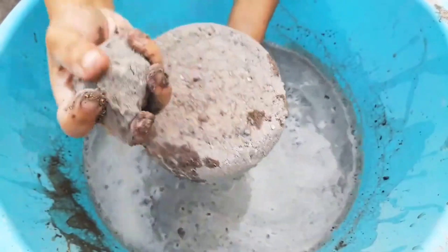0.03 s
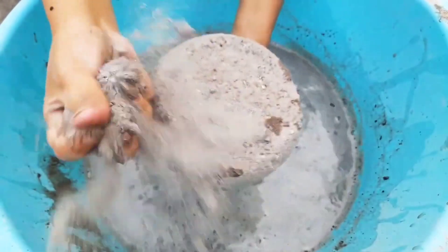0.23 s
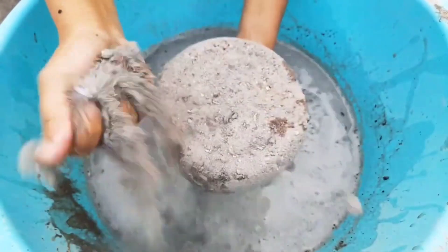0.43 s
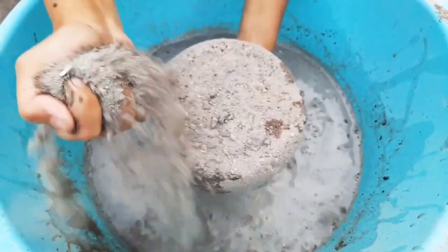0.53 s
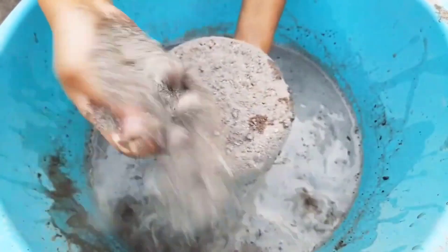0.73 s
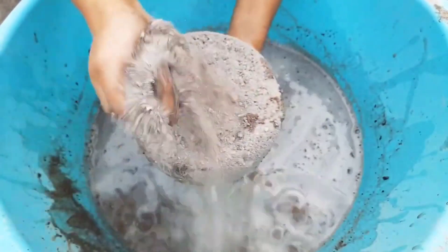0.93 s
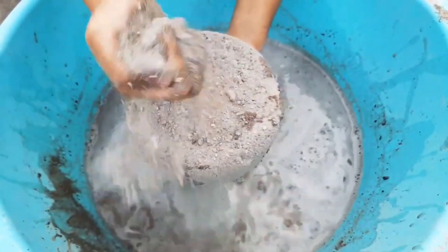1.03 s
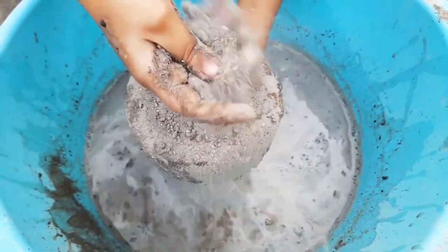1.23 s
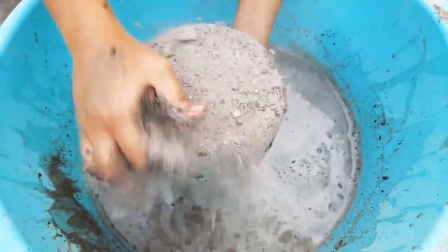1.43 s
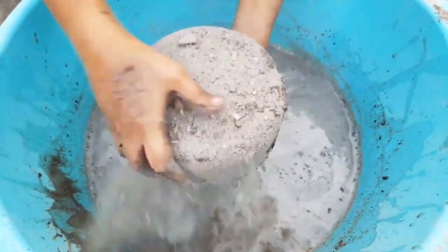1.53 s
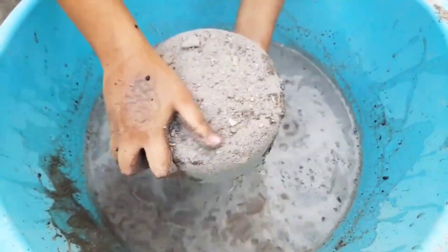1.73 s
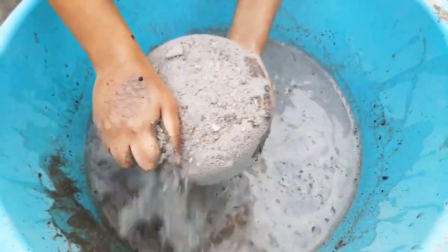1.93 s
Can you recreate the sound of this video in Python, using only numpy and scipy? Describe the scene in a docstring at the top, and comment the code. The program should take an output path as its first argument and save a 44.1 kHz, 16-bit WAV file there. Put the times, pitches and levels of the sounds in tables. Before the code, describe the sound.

Gritty sand showers into a plastic basin of water as a hand crumbles a block, close by. The hiss and patter build from 0.2 seconds and are heaviest between 0.4 and 0.8, with clicking chips, small bubbles and one loud plop at 0.6. The flow thins to light spills after 1.1, then surges again around 1.7 and 1.9. A faint low rumble and hum lie underneath.

```python
"""Sand showers down in waves as a hand crumbles a gritty block over a plastic basin of water, close by.
Crumbs tick and slap on the water, hard chips clink and pebbles snap.
Lumps plunge and ring the basin; trapped air rings as small bubbles.
A low rumble with a faint hum lies underneath."""
import sys
import numpy as np
from scipy import signal
from scipy.fft import rfft, irfft, next_fast_len
from scipy.io import wavfile

SR = 44100
rng = np.random.default_rng(int(sys.argv[2]) if len(sys.argv) > 2 else 0)


def generate_wav(signal):
    """Clip the signal to [-1, 1] and save it as 16-bit WAV at the path in sys.argv[1]."""
    frames = np.transpose(np.atleast_2d(signal))
    scaled = np.clip(frames, -1, 1) * 32767
    pcm = np.round(scaled).astype(np.int16)
    wavfile.write(sys.argv[1], SR, pcm)


N = 88200
TIME = np.arange(N) / SR
TOP_HZ = 15900


def amp(db):
    """Decibels to gain."""
    return 10 ** (np.asarray(db) / 20)


def unit_rms(x):
    """Scale to rms 1."""
    return x / np.sqrt(np.mean(x ** 2) + 1e-20)


def at_hz(points, hz):
    """Interpolate (frequency [Hz], value) points on a log axis."""
    knots_hz, values = np.transpose(points)
    return np.interp(np.log(hz + 1), np.log(knots_hz + 1), values)


def over_time(points):
    """Interpolate (time [s], value) points at every sample."""
    return np.interp(TIME, *np.transpose(points))


def filtered(x, response):
    """Apply a frequency-dependent gain."""
    size = next_fast_len(N + 8192)
    return irfft(rfft(x, size) * response(np.fft.rfftfreq(size, 1 / SR)), size)[..., :N]


def coloured(pair, spectrum, correlation):
    """Two independent signals to stereo of rms 1 with this spectrum and left-right correlation."""
    def mid_side_gains(hz):
        angle = np.arccos(np.clip(at_hz(correlation, hz), -1, 1)) / 2
        return amp(at_hz(spectrum, hz)) * [np.cos(angle), np.sin(angle)]
    mid, side = filtered(pair, mid_side_gains)
    return unit_rms(np.array([mid + side, mid - side]))


def noise():
    """Two-channel white noise."""
    return rng.standard_normal((2, N))


def strike(start_s, attack_s, t60_s):
    """Envelope: quick rise, exponential fall."""
    age_s = np.maximum(TIME - start_s, 0)
    return (1 - np.exp(-age_s / attack_s)) * amp(-60 * age_s / t60_s)


def ring(start_s, hz, t60_s, attack_s, rise_per_s=0):
    """Damped sine with optional upward glide."""
    age_s = np.maximum(TIME - start_s, 0)
    tone = np.sin(2 * np.pi * hz * age_s * (1 + rise_per_s * age_s / 2))
    return strike(start_s, attack_s, t60_s) * tone


def grains(per_s, spread_db, life_s):
    """Tiny noise bursts, random in size and time."""
    hits = rng.random(N) < per_s / SR
    sizes = amp(spread_db * np.clip(rng.standard_normal(N), -2, 2))
    power = signal.lfilter([1], [1, -np.exp(-2 / (life_s * SR))], hits * sizes ** 2)
    return unit_rms(noise() * np.sqrt(power))


def pings(centre_hz, spread_oct, t60_cycles, spread_db, count):
    """Short damped sines, random in time, pitch and size."""
    onset, pitch, size = rng.random((count, 3)).T[:, :, None]
    step = np.arange(SR // 30)
    hz = np.minimum(centre_hz * 2 ** (spread_oct * (2 * pitch - 1)), TOP_HZ)
    cycles = hz * step / SR
    envelope = (1 - np.exp(-cycles)) * amp(-60 * cycles / t60_cycles)
    waves = amp(spread_db * (2 * size - 1)) * envelope * np.sin(2 * np.pi * cycles)
    samples = (onset * N).astype(int) + step
    return np.bincount(samples.ravel(), waves.ravel(), N)[:N]


def echo(x, t60_s, delay_s=0):
    """Convolve with a diffuse stereo tail of energy 1."""
    tail = noise() * strike(delay_s, attack_s=0.00017, t60_s=t60_s)
    tail /= np.linalg.norm(tail, axis=1, keepdims=True)
    return signal.fftconvolve(np.atleast_2d(x), tail, axes=1)[:, :N]


# Rumble envelopes, bass and low-mid (time [s], level [dB])
BASS_LEVEL = [(0, -39), (.25, -39.5), (.7, -38), (1.05, -40), (1.4, -41.5), (1.68, -39.5), (1.85, -41),
              (2, -41)]
LOW_MID_LEVEL = [(0, -52), (.3, -45), (.75, -48), (1.15, -48.5), (1.35, -59), (1.65, -52), (2, -53.5)]
# Rumble spectra (frequency [Hz], relative density [dB])
BASS_SPECTRUM = [(20, -42), (33, -35), (50, -8), (72, -13.5), (98, -2), (125, 0), (160, -7), (200, -28),
                 (250, -27), (310, -22.5), (430, -23), (650, -31), (1200, -39), (1800, -34), (3000, -52),
                 (15000, -54)]
LOW_MID_SPECTRUM = [(120, -56), (150, -4.5), (172, 0), (200, -8), (245, -1), (300, -2.5), (360, -13.5),
                    (450, -17), (620, -42), (1200, -49)]
# Rumble stereo image (frequency [Hz], left-right correlation [-1..1])
RUMBLE_CORRELATION = [(150, .96), (400, 0.68), (2000, 0.067)]
def background(hum_hz=102.4, hum_db=-52):
    """Distant rumble swells and fades over a faint hum."""
    bass = amp(over_time(BASS_LEVEL)) * coloured(noise(), BASS_SPECTRUM, RUMBLE_CORRELATION)
    low_mid = amp(over_time(LOW_MID_LEVEL)) * coloured(noise(), LOW_MID_SPECTRUM, RUMBLE_CORRELATION)
    return bass + low_mid + amp(hum_db) * np.sin(2 * np.pi * hum_hz * TIME)


# Single bubbles (time [s], level [dB], frequency [Hz], t60 [s])
BUBBLES = [(.2053, -25.5, 1500, .011), (0.2073, -21.5, 333, 0.057), (0.4378, -23.5, 1140, 0.026),
           (0.4787, -22.5, 859, 0.053), (.5502, -14.5, 790, 0.022), (.5727, -19, 1020, .016),
           (.596, -20, 1230, 0.031), (0.7337, -18, 530, 0.026), (0.7911, -22.5, 804, 0.014),
           (1.045, -33, 1350, 0.015), (1.098, -29, 2380, 0.012), (1.119, -35, 2870, 0.015),
           (1.194, -37.5, 860, 0.029), (1.209, -38.5, 1980, 0.026), (1.271, -36, 2400, 0.022),
           (1.284, -31.5, 1350, 0.024), (1.391, -23, 1290, 0.018), (1.3945, -34.5, 830, 0.049),
           (1.473, -28, 1790, 0.018), (1.506, -39, 1790, 0.023), (1.599, -33.5, 3230, 0.013),
           (1.602, -36.5, 1120, 0.019), (1.627, -27.5, 2760, .018), (1.657, -25.5, 930, 0.019),
           (1.685, -29, 3200, .015), (1.7061, -27, 1324, 0.024), (1.716, -34, 1150, 0.014),
           (1.751, -32.5, 1650, .035), (1.889, -27, 1640, 0.017)]
def bubbles(wall_db=-6):
    """Trapped air rings, rising slightly in pitch; the basin wall scatters the sound."""
    air = sum(amp(db) * ring(s, hz, t60_s, attack_s=0.00076, rise_per_s=1)
              for s, db, hz, t60_s in BUBBLES)
    return air + amp(wall_db) * echo(air, t60_s=0.022, delay_s=0.0007)


# Chip clinks (time [s], level [dB], frequency [Hz])
CHIPS = [(0.3714, -24, 6300), (0.379, -31, 7000), (.4235, -26, 6400), (0.503, -17.5, 7100),
         (0.66, -22, 7660), (0.7081, -19.5, 5900), (.804, -17, 5630), (.824, -24, 6500),
         (0.845, -22.5, 5500), (0.957, -21.5, 5600), (0.963, -23.5, 5000), (1.48, -30, 4450),
         (1.498, -29.5, 3540), (1.736, -18.5, 5870), (1.8075, -23.5, 5900)]
def chips():
    """Hard chips ring briefly, heard off the basin wall."""
    rings = sum(amp(db) * ring(s, hz, t60_s=0.0053, attack_s=0.0001) for s, db, hz in CHIPS)
    return echo(rings, t60_s=0.013)


# Grit stereo image (frequency [Hz], left-right correlation [-1..1])
GRIT_CORRELATION = [(300, 0.99), (900, 0.15), (1500, 0.5), (2300, -0.12), (4500, -0.13), (12000, 0)]
def grit(pair, spectrum):
    """Colour impact noise: centred lows, wide highs."""
    return coloured(pair, spectrum, GRIT_CORRELATION)


# Pebble impacts (time [s], relative level [dB])
SNAPS = [(.4331, -15), (.4365, -16), (.5484, -17), (.5727, -16), (.5921, -10), (.8041, -21), (1.3899, -17),
         (1.8077, -23)]
# Snap spectrum (frequency [Hz], relative density [dB])
SNAP_SPECTRUM = [(500, -20), (2500, -5), (5000, 8), (7200, -11), (8200, -15), (11000, -5), (15500, -7)]
def pebbles(gain_db=2.5):
    """Pebbles hit something solid: one short, bright crack each."""
    cracks = sum(amp(db + gain_db) * strike(s, attack_s=0.00002, t60_s=0.0016) for s, db in SNAPS)
    return cracks * grit(noise(), SNAP_SPECTRUM)


# Plunges (time [s], level [dB])
LUMPS = [(0.4788, -19), (0.6069, -1.5), (0.7017, -17), (.984, -22), (1.0698, -29.5), (1.7211, -31)]
# Basin and air-cavity modes (frequency [Hz], relative level [dB], t60 [s])
BASIN_MODES = [(294, -16, 0.044), (354, -14.5, 0.033), (497, -6.5, 0.033), (896, -1.5, 0.023),
               (983, -2, 0.02), (1272, -7, 0.029), (1575, -9, 0.024)]
def lumps(far_wall_db=-6, left_right_delays_s=(0.00219, 0.002556), scatter_db=-15):
    """Plunging lumps ring the basin; the far wall reflects the sound."""
    plunge = sum(amp(db + mode_db) * ring(s, hz, t60_s, attack_s=0.0017)
                 for s, db in LUMPS for hz, mode_db, t60_s in BASIN_MODES)
    reflection = np.array([np.interp(TIME - delay_s, TIME, plunge) for delay_s in left_right_delays_s])
    scatter = echo(plunge, t60_s=0.019, delay_s=0.0024)
    return plunge + amp(far_wall_db) * reflection + amp(scatter_db) * scatter


# Crumb ticks and cluster slaps (time [s], level [dB], t60 [s])
TICKS = [(0.2309, -32.5, 0.05), (0.281, -36.5, 0.022), (0.331, -33, 0.014), (0.3707, -39, 0.013),
         (0.3902, -32, 0.065), (0.421, -48, 0.016), (0.4322, -19.5, 0.019), (0.4365, -24, 0.039),
         (.452, -24, 0.019), (0.504, -24.5, 0.014), (0.513, -27, 0.018), (0.549, -18.5, 0.0054),
         (.5597, -22, 0.021), (0.5725, -24, 0.0074), (0.5902, -18, 0.026), (0.595, -24, 0.02),
         (0.6063, -20, .02), (0.651, -28, 0.028), (.709, -38, 0.0097), (0.7312, -31, 0.02),
         (0.8025, -30, .013), (0.817, -25.5, 0.025), (0.822, -32, 0.016), (0.845, -34, 0.038),
         (.865, -41, 0.013), (0.889, -34, 0.015), (.957, -34, 0.074), (1, -32, .02), (1.069, -28.5, 0.022),
         (1.278, -30, 0.017), (1.3882, -26.5, 0.036), (1.4138, -40, .012), (1.433, -34, 0.025),
         (1.4737, -33.5, 0.017), (1.655, -28.5, 0.026), (1.7193, -26.5, 0.018), (1.737, -38, 0.024),
         (1.8073, -31.5, 0.005), (1.89, -32.5, 0.063)]
SLAPS = [(.2053, -28.5, 0.029), (.28, -35.5, 0.047), (0.393, -33, 0.059), (0.434, -23, 0.037),
         (0.439, -31, 0.043), (0.473, -21.5, 0.058), (0.511, -31, 0.15), (0.548, -29, .035),
         (0.571, -16.5, 0.028), (0.5911, -18.5, 0.038), (0.594, -25, 0.081), (0.608, -24.5, 0.052),
         (0.687, -26, .05), (.698, -21.5, 0.068), (0.732, -30, 0.028), (0.79, -26.5, 0.029),
         (0.802, -29, .03), (0.815, -24.5, 0.059), (0.975, -34.5, 0.15), (1.07, -25, 0.017),
         (1.191, -46, .025), (1.284, -38.5, 0.07), (1.391, -30, 0.028), (1.655, -28, 0.022),
         (1.705, -28.5, 0.021), (1.717, -29.5, 0.066), (1.886, -29, 0.015)]
# Tick and splash spectra (frequency [Hz], relative density [dB])
TICK_SPECTRUM = [(200, -20), (1000, -16.5), (2500, -4.5), (4500, 3), (7200, 2), (8100, -4.5), (10000, -2.5),
                 (15500, -5.5)]
SPLASH_SPECTRUM = [(100, -26), (280, -11), (480, -3.5), (590, -11), (700, -10), (860, -0.5), (1250, -1.5),
                   (1650, -4.5), (2300, -9), (3500, -13.5), (8000, -45)]
def crumbs(click_db=-3.5):
    """Crumbs tick brightly, with a click at first contact; clusters slap the water, duller."""
    ticks = sum(amp(db) * strike(s, attack_s=0.00033, t60_s=t60_s) for s, db, t60_s in TICKS)
    clicks = sum(amp(db + click_db) * strike(s, attack_s=0.00005, t60_s=0.0015) for s, db, _ in TICKS)
    slaps = sum(amp(db) * strike(s, attack_s=0.0015, t60_s=t60_s) for s, db, t60_s in SLAPS)
    return (ticks + clicks) * grit(noise(), TICK_SPECTRUM) + slaps * grit(noise(), SPLASH_SPECTRUM)


def spray(flow_db, stray_db=3.5, fizz_db=1):
    """Stray grains click and tiny bubbles pop with the sand flow, heard off the basin wall."""
    strays = pings(centre_hz=5470, spread_oct=0.8, t60_cycles=16, spread_db=11, count=100)
    fizz = pings(centre_hz=1880, spread_oct=0.88, t60_cycles=14, spread_db=8.5, count=70)
    return echo(amp(flow_db) * (amp(stray_db) * strays + amp(fizz_db) * fizz), t60_s=0.012)


def crackle(flow_db, gain_db=-11.5):
    """Coarse grains land one by one."""
    return amp(flow_db + gain_db) * grit(grains(per_s=34, spread_db=3, life_s=0.0016), TICK_SPECTRUM)


# Sand flow (time [s], level [dB])
SAND_FLOW = [(0, -61), (.1, -55.5), (.21, -48), (.24, -46), (.35, -48.5), (.42, -46), (.48, -36.5),
             (.59, -36.5), (.63, -44), (.68, -38), (.77, -41), (.87, -43), (.94, -46), (.98, -39.5),
             (1.04, -48.5), (1.1, -44.5), (1.16, -55.5), (1.25, -53), (1.29, -42.5), (1.36, -52.5),
             (1.42, -45), (1.53, -52), (1.6, -46.5), (1.66, -37), (1.72, -34.5), (1.77, -48), (1.86, -43),
             (1.895, -38), (1.94, -44), (2, -42)]
# Hiss spectrum (frequency [Hz], relative density [dB])
HISS_SPECTRUM = [(150, -14), (800, -29), (2200, 0.5), (3500, -1.5), (5500, -0.5), (7200, -1), (8000, -7.5),
                 (9500, -8.5), (12000, -3.5), (15500, -7.5)]
def sand(reference_db=-40, patter_offset_db=-5.5, patter_db_per_db=1.45):
    """Fine grains hiss, coarser ones patter on the water; crackle and spray follow the same flow."""
    flow_db = over_time(SAND_FLOW)
    fine = grains(per_s=900, spread_db=-1.5, life_s=0.0011) + 0.61 * noise()
    hiss = amp(flow_db) * grit(fine, HISS_SPECTRUM)
    coarse = grains(per_s=260, spread_db=-1, life_s=0.0053)
    patter_db = reference_db + patter_offset_db + patter_db_per_db * (flow_db - reference_db)
    patter = amp(patter_db) * grit(coarse, SPLASH_SPECTRUM)
    return hiss + patter + crackle(flow_db) + spray(flow_db)


def scene(room_db=-18.5):
    """Water and falling grit, a faint echo of the surroundings, and the background."""
    water = lumps() + bubbles()
    near = water + sand() + chips() + pebbles() + crumbs()
    return near + amp(room_db) * echo(near, t60_s=0.058, delay_s=0.015) + background()


def record(dry):
    """Steep low-pass at TOP_HZ."""
    return filtered(dry, lambda hz: 1 / np.sqrt(1 + (hz / TOP_HZ) ** 200))


dry = scene()
out = record(dry)
generate_wav(out)
```